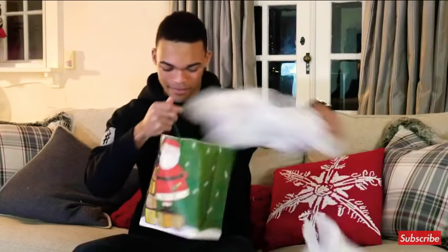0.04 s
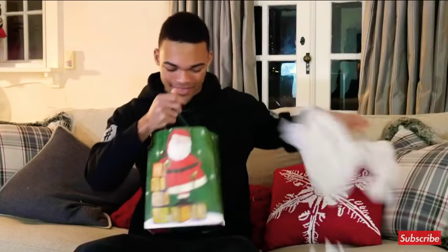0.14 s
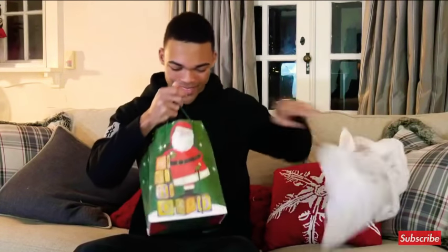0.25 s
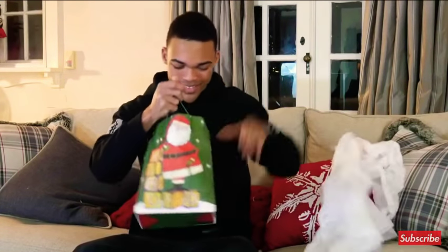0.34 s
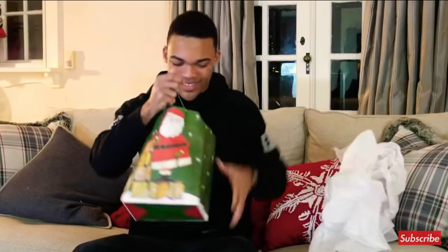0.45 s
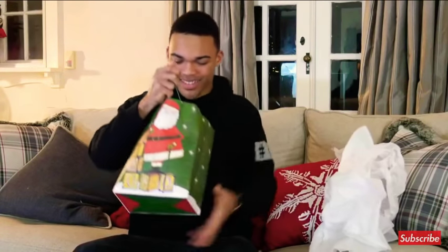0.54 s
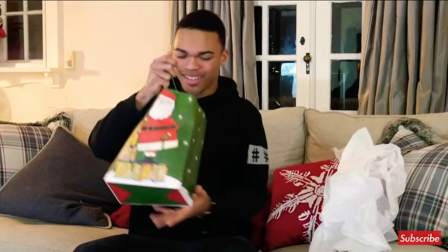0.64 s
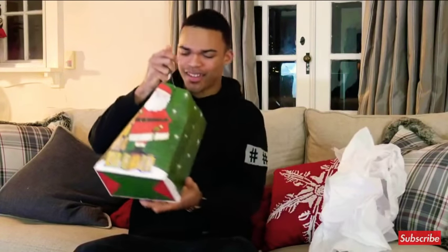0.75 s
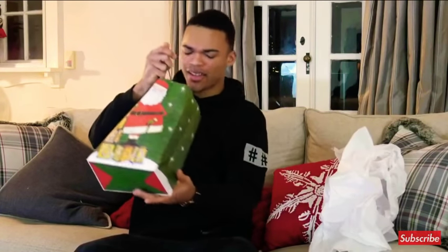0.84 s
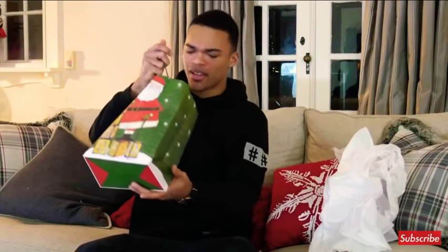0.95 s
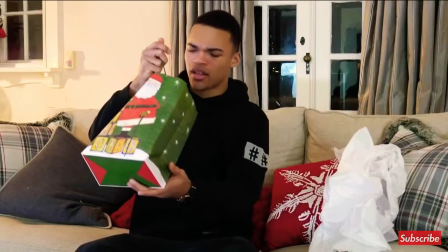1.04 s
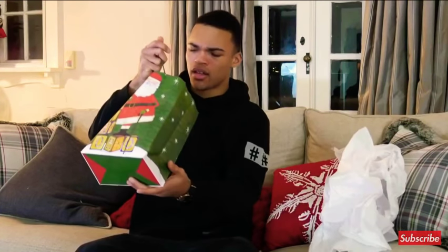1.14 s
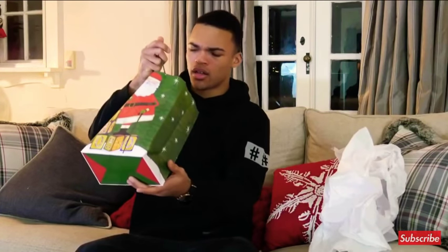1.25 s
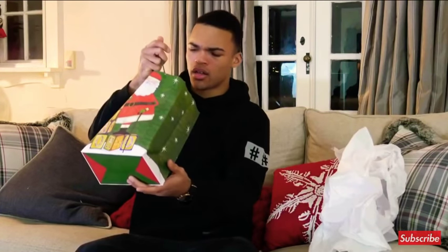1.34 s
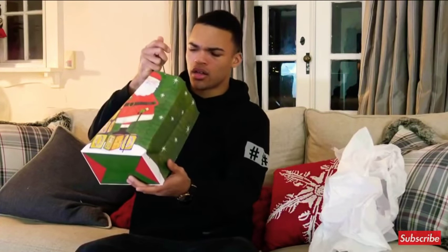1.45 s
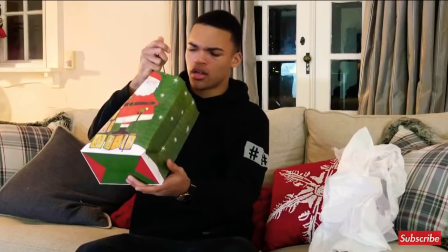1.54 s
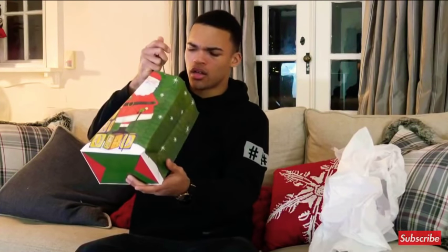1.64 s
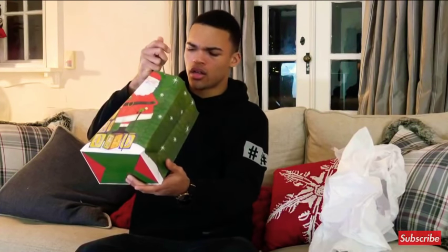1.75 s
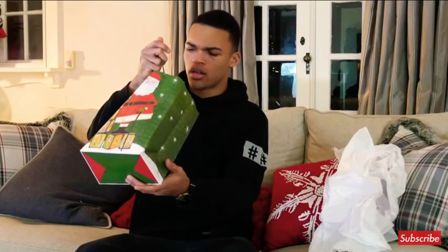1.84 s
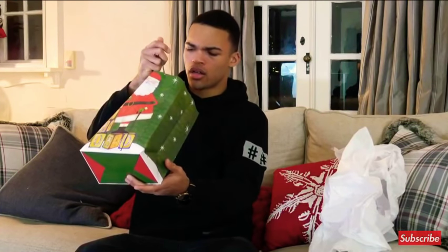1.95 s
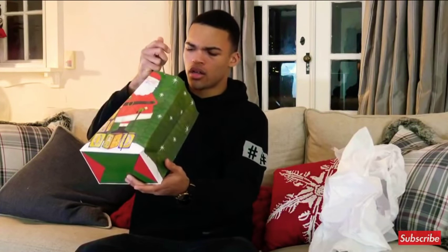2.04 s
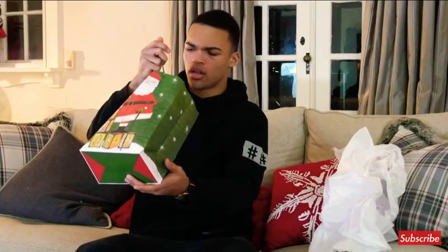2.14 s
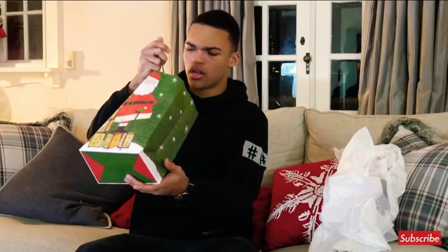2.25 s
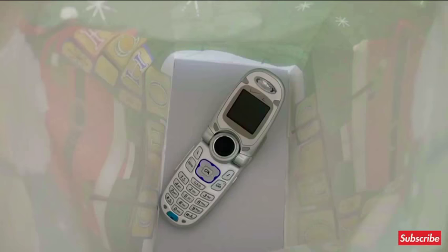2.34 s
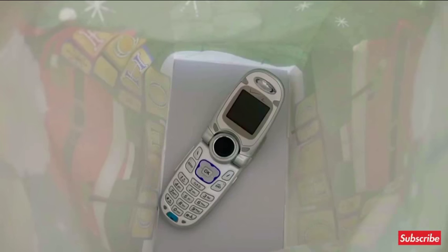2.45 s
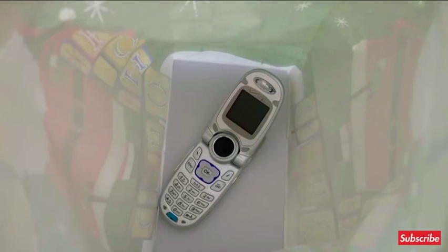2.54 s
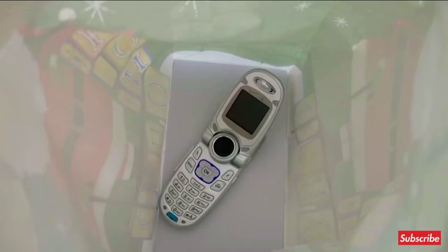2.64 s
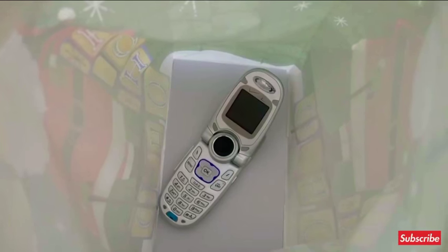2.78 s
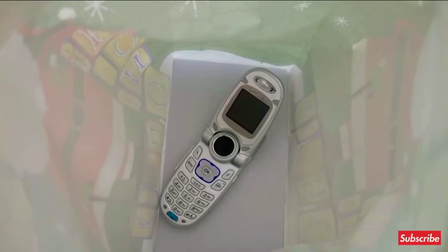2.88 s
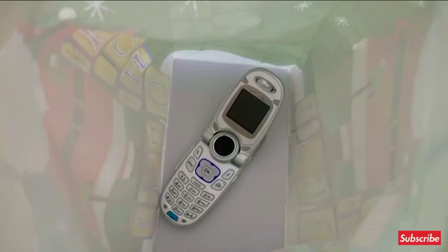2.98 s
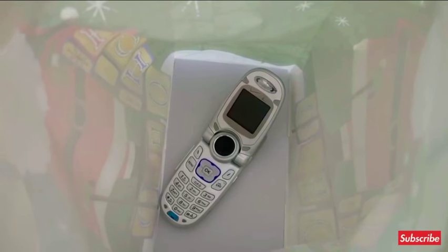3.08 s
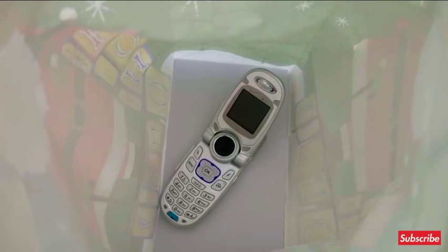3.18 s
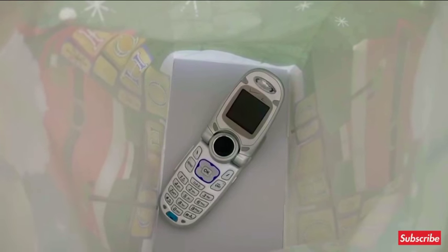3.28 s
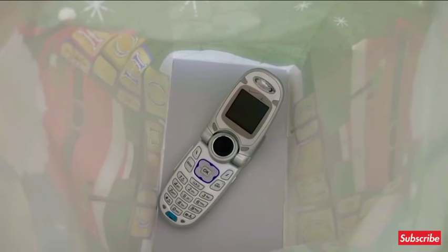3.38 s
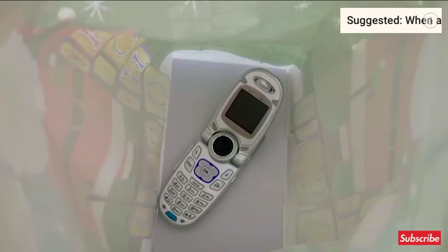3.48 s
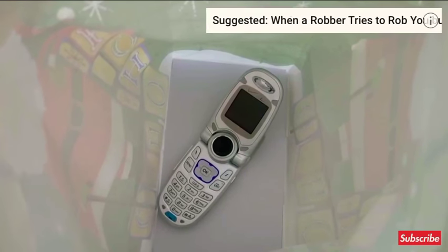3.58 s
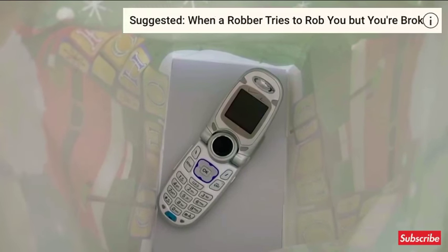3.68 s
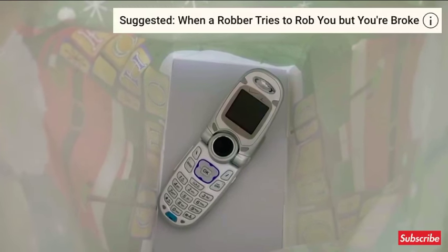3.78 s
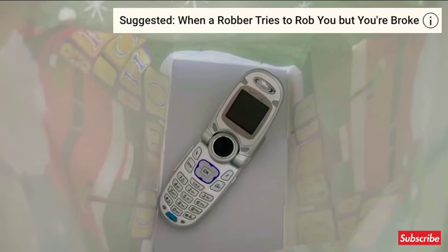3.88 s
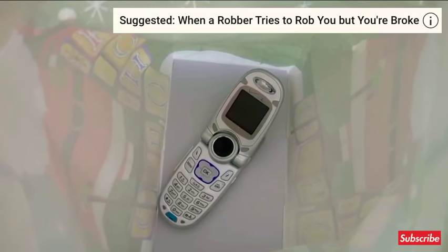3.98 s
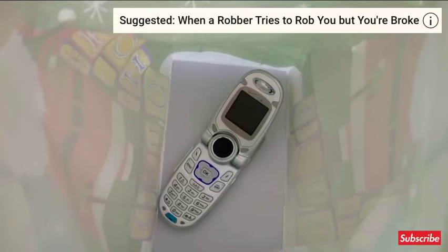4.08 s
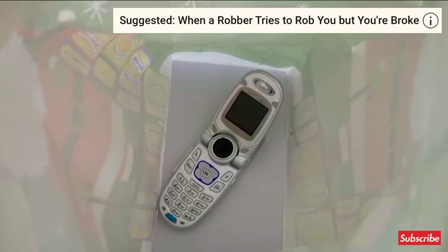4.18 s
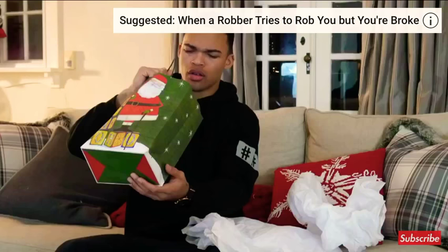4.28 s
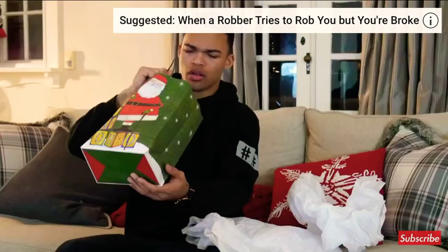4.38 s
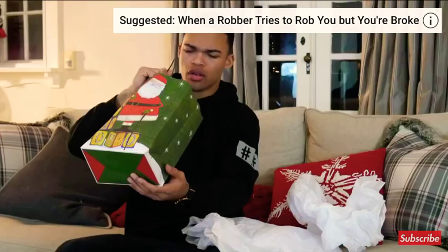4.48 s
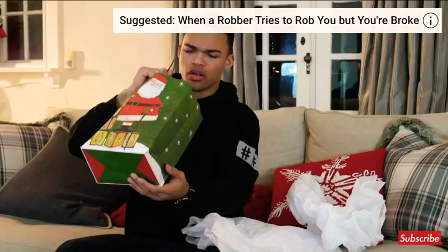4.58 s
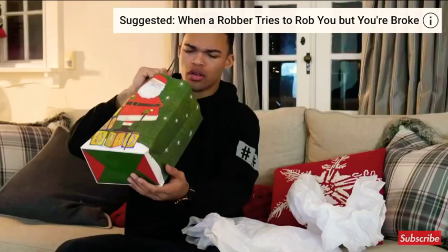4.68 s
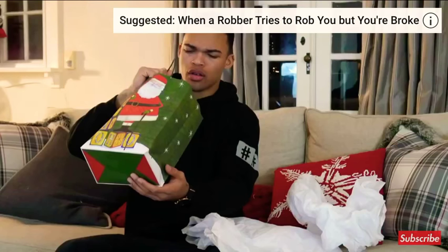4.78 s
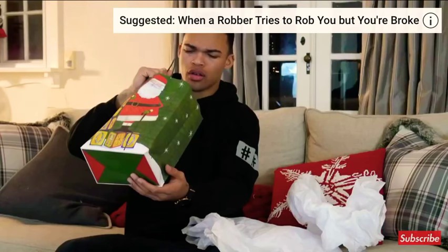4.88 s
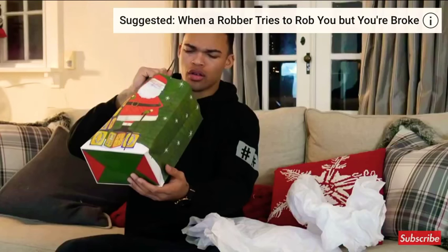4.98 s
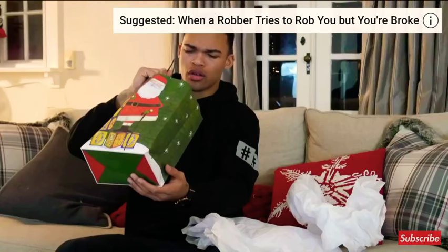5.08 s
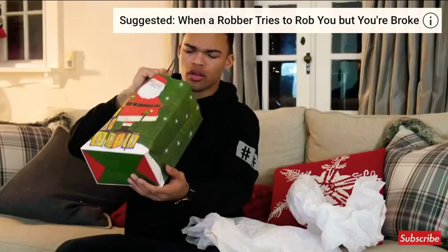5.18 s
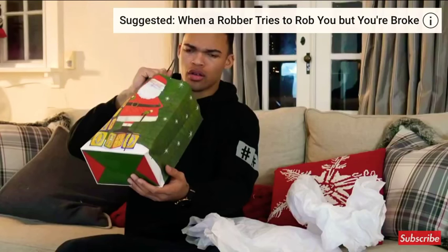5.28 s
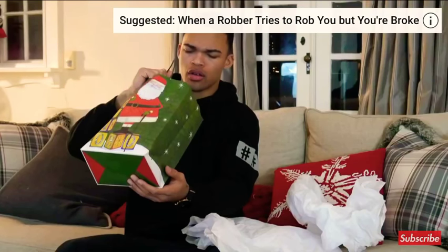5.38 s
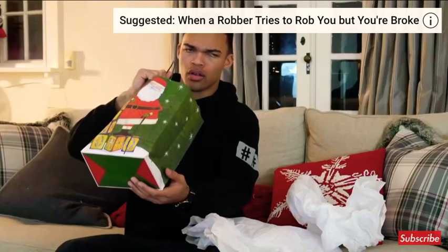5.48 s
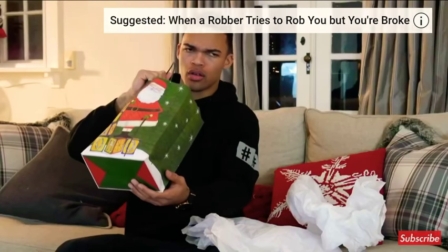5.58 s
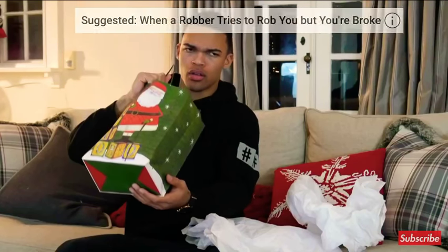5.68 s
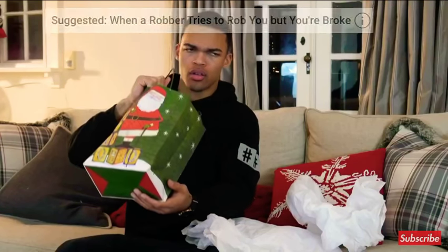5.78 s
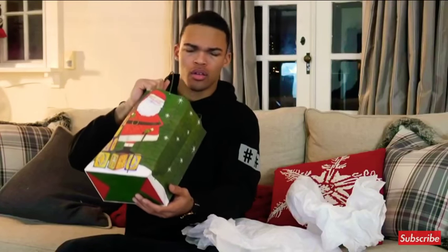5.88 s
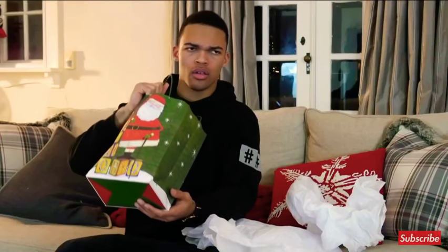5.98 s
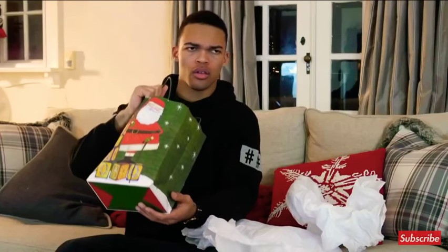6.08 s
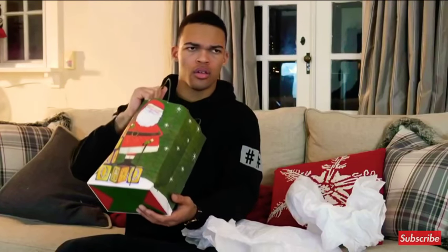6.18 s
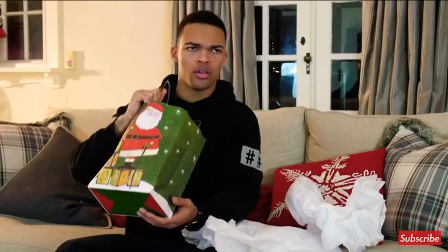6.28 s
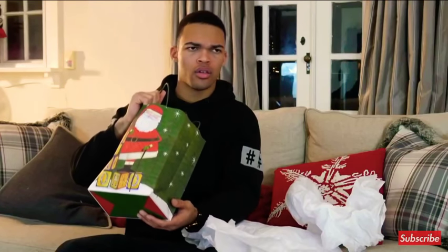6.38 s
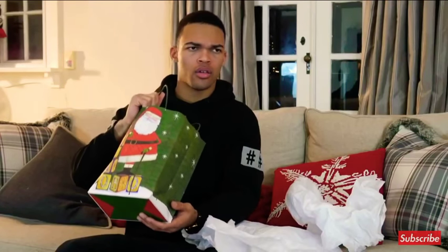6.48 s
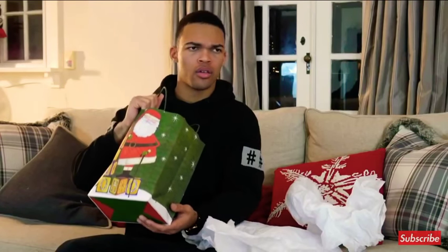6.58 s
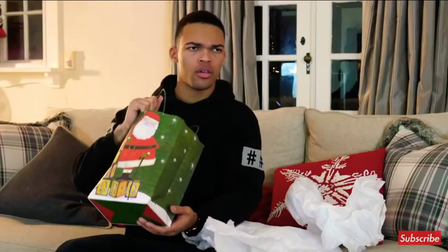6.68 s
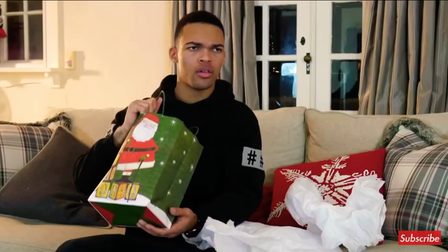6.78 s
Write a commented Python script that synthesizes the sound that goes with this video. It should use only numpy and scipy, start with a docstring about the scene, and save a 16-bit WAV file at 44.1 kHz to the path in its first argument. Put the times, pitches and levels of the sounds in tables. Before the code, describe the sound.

Loud tissue rustling and papery thumps open the scene, one sharp crease snapping out early, then the handling quickly settles. The held bag gives tiny ticks in a hushed, hissy room with a steady faint hum. The background abruptly turns deeper and nearly empty for two seconds, then switches back; a soft bag pop follows, and light creasing gathers at the end. Mono, some way off, with slight indoor reverberation.

```python
"""Tissue paper is pulled from a stiff paper gift bag in a furnished living room: grains of creasing over a rush.
Then the bag is only held: single creases ring and tick, and its walls pop and rattle as resonant panels.
Behind lie a faint appliance hum of steady lines and a room tone of filtered noise. One mono microphone, some way
off; for about two seconds it sits close over the bag, where the room drones lower and only stray creases sound."""
import sys
import numpy as np
from scipy import signal
from scipy.fft import rfft, irfft, next_fast_len
from scipy.io import wavfile
from scipy.ndimage import uniform_filter1d, map_coordinates

SR = 44100
rng = np.random.default_rng(int(sys.argv[2]) if len(sys.argv) > 2 else 0)


def generate_wav(sig):
    """Save sig (samples, or channels by samples) to the path in sys.argv[1] as 16-bit PCM at SR."""
    pcm = np.round(np.clip(np.atleast_2d(sig).T, -1, 1) * 32767).astype(np.int16)
    wavfile.write(sys.argv[1], SR, pcm)


def nominal_scale(level):
    """Amplitude ratio for a level in decibels (scalar or array-like)."""
    x = np.asarray(level, float) / 20
    return 10 ** x


N = 301203

# How busily the paper is handled: [t/s, tissue rustle level/dB, bag wall rustle level/dB]
PAPER_MOVEMENT = [(0.0, -28, -27.5), (0.05, -29.5, -34), (0.15, -28.5, -38.5), (0.24, -28.5, -36.5),
                  (0.274, -32, -35.5), (0.383, -40.5, -48.5), (0.5, -37, -45), (0.63, -43.5, -49.5),
                  (0.768, -53, -52), (0.848, -45.5, -52), (0.954, -52, -51), (1.092, -60.5, -59),
                  (1.26, -63, -71), (1.7, -74, -73), (1.84, -66, -70.5), (1.95, -72, -75), (2.04, -74, -74),
                  (2.12, -68, -75), (2.28, -71.5, -77), (2.56, -67.5, -73), (4.5, -74, -72.5),
                  (5.2, -76, -76), (5.78, -71.5, -75.5), (5.9, -63, -70.5), (6.3, -61, -65.5),
                  (6.53, -61, -64), (6.83, -60.5, -65)]
# Single creases, each with the flurry of rustle it sets off:
# [t/s, level/dB, ring f/Hz, flurry level against the crease/dB]
CREASES = [(0.3888, -22, 8300, -9.5), (1.1007, -42.5, 3900, -13), (1.271, -46, 9000, -35),
           (1.278, -39.5, 7300, -46), (1.317, -47, 11100, -12), (1.3241, -37, 10900, -37),
           (1.401, -51, 3000, -31), (1.44, -51, 4940, -22), (1.446, -44, 5430, -11),
           (1.473, -42.5, 6460, -19), (1.536, -48, 10500, -18), (1.543, -40.5, 10400, -21),
           (1.5728, -39.5, 3500, -19), (1.704, -51, 9500, -24), (1.748, -46, 11000, -18),
           (1.753, -42, 11500, -19), (1.7702, -40, 3800, -16), (1.797, -44.5, 5730, -14),
           (1.998, -48.5, 4100, -13), (2.004, -49, 2960, -21), (2.0787, -51, 9000, -16),
           (2.1072, -53, 4860, -22), (2.1501, -54, 9500, -20), (2.175, -46, 5910, -27),
           (2.182, -45, 6160, -30), (2.2346, -48, 3970, -13), (2.243, -50, 11000, -19),
           (2.3057, -50, 4250, -22), (2.318, -51, 9500, -26), (2.33, -47, 10000, -25),
           (2.379, -51, 11000, -22), (2.401, -52, 9500, -24), (2.447, -52, 10000, -17),
           (2.516, -46.5, 6760, -22), (2.531, -47, 9800, -41), (2.557, -40, 10800, -33),
           (2.847, -47.5, 10100, -28), (2.853, -47, 10300, -26), (3.107, -45.5, 3950, -19),
           (3.1062, -51, 1750, -33), (3.73, -54, 1620, -26), (3.922, -52, 2130, -17),
           (4.59, -48.5, 10000, -11), (4.6748, -51, 10300, -31), (4.722, -51, 7080, -34),
           (4.7936, -48, 10800, -22), (5.031, -47, 6800, -27), (5.0517, -50, 9900, -13.5),
           (5.134, -50, 6800, -24), (5.177, -49.5, 6300, -15), (5.275, -54, 3650, -15),
           (5.3237, -45, 10700, -33), (5.424, -43, 10900, -25), (5.879, -46.5, 5600, -21),
           (5.912, -46, 9500, -25), (6.013, -42, 6590, -34), (6.018, -38, 7200, -30),
           (6.026, -41, 7850, -22), (6.0693, -54, 3000, -27), (6.103, -55, 10500, -32),
           (6.1599, -49, 2320, -26), (6.162, -52, 10000, -30), (6.195, -51, 3500, -22),
           (6.253, -41, 3180, -20), (6.348, -49, 3470, -24), (6.374, -47, 12500, -30),
           (6.4313, -47, 7000, -28), (6.42, -46, 3000, -22), (6.483, -50, 4500, -11),
           (6.523, -47, 3000, -25), (6.5697, -41, 10000, -26), (6.655, -41, 8000, -22),
           (6.675, -44, 2260, -40), (6.7573, -42, 2400, -31), (6.764, -41.5, 2820, -27)]
# Bag walls flexing: [t/s, level/dB, rattle decay t/s, brightness level/dB, favoured f/Hz]
WALL_KNOCKS = [(0.001, -21, 0.0062, -10, 574), (0.02, -35, 0.0081, -8, 850),
               (0.037, -19.5, 0.0075, -2, 690), (0.045, -23, 0.0073, -15, 680),
               (0.067, -32, 0.012, -6, 700), (0.195, -32, 0.0093, -7, 830), (0.231, -29.5, 0.012, -15, 536),
               (0.388, -38, 0.095, -17, 596), (0.574, -31, 0.058, 5, 710), (0.609, -31.5, 0.013, 12, 1500),
               (0.617, -24.5, 0.0076, 9, 1550), (0.629, -24, 0.043, 5.5, 875),
               (0.664, -30, 0.041, -10, 603), (0.849, -36, 0.038, -8, 537), (0.866, -32, 0.029, -7, 303),
               (1.0075, -30.5, 0.025, -5, 2050), (1.009, -40, 0.015, 7, 950), (1.026, -32, 0.0073, -1, 580),
               (1.036, -35.5, 0.011, -12, 375), (1.06, -42.5, 0.03, -2, 383),
               (1.075, -49, 0.025, -20, 2200), (1.289, -52.5, 0.0093, 13.5, 1880),
               (1.468, -53.5, 0.053, 3, 480), (1.994, -59, 0.014, 12, 1300), (4.8164, -35, 0.013, 0, 950),
               (4.826, -37, 0.024, -14, 700), (4.834, -37, 0.017, -12, 264), (4.851, -40, 0.014, -12, 680),
               (4.9, -48.5, 0.035, -25, 700), (5.298, -54, 0.027, -21, 790), (5.834, -50, 0.012, -18, 870),
               (5.853, -51, 0.018, -18, 880), (6.012, -54, 0.025, -10, 2300), (6.739, -49, 0.051, 1, 2180)]
# Colour of the tissue rustle: [f/Hz, relative level/dB]
TISSUE_COLOUR = [(60, -120), (700, -29), (1200, -2), (1820, -3.5), (2350, -3.5), (3200, -5), (4500, -6.5),
                 (6200, -6), (7900, -8.5), (9800, -5), (13500, -12), (15200, -21)]
# Colour of the bag wall rustle: [f/Hz, relative level/dB]
WALL_COLOUR = [(71, -43), (120, -13), (241, -10), (484, -3.5), (681, -7), (821, -6.5), (1060, -9.5),
               (1150, -13.5), (1730, -13), (2020, -12), (7000, -31.5), (9100, -73), (15400, -120)]
# The busier the tissue, the more its crackle fuses to a rush: [rustle level/dB, smooth share 0-1]
RUSH_SHARE = [(-62, .15), (-30, .72)]
# Slips of one crease, the main one first, then weaker ones scattered just before or after it:
# [level against the crease/dB]
SLIP_LEVELS = [-2, -13, -15, -17]
# Resonances of the bag walls: [f/Hz, width/Hz, level/dB]
WALL_MODES = [(225, 90, -3), (375, 45, -2.5), (480, 90, -5), (600, 70, -5), (694, 24, -1), (860, 65, -5),
              (1030, 65, -6), (1283, 100, -8), (1545, 55, -9), (1750, 80, -9), (2035, 45, -8),
              (2218, 28, -6), (2410, 60, -12)]
# While the microphone is close over the bag: [from t/s, to t/s]
CLOSE_SPAN = (2.565, 4.495)
# Reverberation of the living room: [f/Hz, time to fall 60 dB t/s]
ROOM_DECAY = [(200, 0.81), (1000, 0.34), (4000, 0.45), (12000, 0.14)]
# Appliance hum lines: [f/Hz, mean level/dB rms]
HUM_LINES = [(236.9, -72), (263.8, -68), (355.3, -72.5), (839.8, -78.5)]
# Colour of the room tone from the far position: [f/Hz, relative level/dB]
FAR_AIR_COLOUR = [(15, -58), (25, -14), (104, -8), (192, -10), (251, -5), (311, -7), (365, -4.5), (441, -8),
                  (659, -14), (839, -16), (1130, -17), (2660, -25.5), (7990, -26.5), (10400, -24),
                  (15200, -30.5)]
# Colour of the room tone close over the bag: [f/Hz, relative level/dB]
CLOSE_AIR_COLOUR = [(15, -67), (25, -22), (48, -48), (75, -9.5), (244, -8), (311, -3.5), (441, -21),
                    (478, -17), (625, -21.5), (795, -20.5), (1130, -26), (2590, -30), (7990, -37),
                    (10200, -32.5), (15200, -39.5)]
# Noisy drone bands from the far position: [f/Hz, nominal width/Hz, mean level/dB]
FAR_DRONES = [(115, 52, -70), (909, 160, -76), (2635, 330, -78.5)]
# Noisy drone bands close over the bag: [f/Hz, nominal width/Hz, mean level/dB]
CLOSE_DRONES = [(141.4, 12, -71), (253, 53, -69), (314.5, 51, -68), (806.5, 32, -77.5), (920, 110, -74),
                (2630, 150, -81.5), (88, 29, -75)]
# Filters on creases, on the body of a knock and on its bright edge: [f/Hz, gain/dB]
CREASE_COLOUR = [(400, -20), (1500, -2.5), (10500, 3.0), (13000, 2.0), (15500, -22)]
KNOCK_BODY_COLOUR = [(30, -34), (90, 2), (200, 6), (16000, 9)]
KNOCK_EDGE_COLOUR = [(700, -13.5), (1500, 15), (1800, 8.0), (2100, 3.5), (2450, 8.5), (3200, 1.5),
                     (6000, -8.5), (14000, -46)]


def unit(x):
    """Scaled to rms 1."""
    return x / np.sqrt(np.mean(x ** 2) + 1e-20)


def along(points, hz):
    """Points (f/Hz, value) read on a log frequency axis."""
    f, v = np.transpose(points)
    return np.interp(np.log(hz + 1), np.log(f + 1), v)


def wobble(rate):
    """A smooth random curve with rate knots a second."""
    knots = rng.standard_normal(int(N * rate / SR) + 4)
    return map_coordinates(knots, [np.arange(N) * rate / SR])


def filtered(x, response):
    """x shaped by a complex response of frequency."""
    m = next_fast_len(N + SR // 2)
    spectrum = rfft(x, m) * response(np.fft.rfftfreq(m, 1 / SR))
    return irfft(spectrum, m)[..., :N]


def causal(spectrum):
    """Minimum-phase response of (f/Hz, gain/dB) points, so nothing rings before a blow."""
    def response(hz):
        cepstrum = irfft(np.log(nominal_scale(along(spectrum, hz)) + 1e-6))
        half = len(cepstrum) // 2
        cepstrum[1:half] *= 2
        cepstrum[half + 1:] = 0
        return np.exp(rfft(cepstrum))
    return response


def handling(still):
    """Gains of tissue and wall rustle: the slow movement, plus a flurry of tissue after each crease."""
    rise_s, decay_s = 0.003, 0.014
    t = np.arange(N) / SR
    s, *levels = np.transpose(PAPER_MOVEMENT)
    tissue, walls = nominal_scale([np.interp(t, s, level) for level in levels]) * (1 - still) + 1e-9
    since = t[:SR // 2]
    flurry = (1 - np.exp(-since / rise_s)) * np.exp(-since / decay_s)
    for start_s, db, _, under_db in CREASES:
        start = round(start_s * SR)
        tissue[start:][:len(since)] += nominal_scale(db + under_db) * flurry[:N - start]
    return tissue, walls


def crackle(per_second, centre_hz, cycles, spread_db, clump_db, smooth):
    """Small patches of sheet buckle in clumps, each a few cycles at its own pitch, over the slide of sheet on sheet."""
    draw = rng.random((int(per_second * N / SR), 3))
    pitch = centre_hz * np.exp(0.698 * rng.standard_normal(len(draw)))
    hz = np.clip(pitch, 300, 15000)[:, None]
    size = nominal_scale(-spread_db * np.log(draw[:, 1:2] + 0.098))
    k = np.arange(64)  # samples in a grain
    decay = np.exp(-k / SR * hz / cycles)
    grains = size * np.sin(2 * np.pi * hz * k / SR) * decay * np.sqrt(hz / centre_hz)
    where = (draw[:, :1] * N).astype(int) + k
    buckling = unit(np.bincount(where.ravel(), grains.ravel(), N + len(k))[:N])
    share = np.clip(smooth, 0, 1)
    mixed = np.sqrt(1 - share) * buckling + np.sqrt(share) * rng.standard_normal(N)
    return unit(mixed * nominal_scale(clump_db * wobble(40)))


def patchy(x, depth_db):
    """Different parts of the sheet move in turn, so bands swell and fade on their own."""
    z = signal.stft(x, nperseg=256)[2]
    across_bands = uniform_filter1d(rng.standard_normal(z.shape), size=14, axis=0)
    field = uniform_filter1d(across_bands, size=10, axis=1)
    return unit(signal.istft(z * nominal_scale(depth_db * unit(field)), nperseg=256)[1][:N])


def rustle(tissue_gain, wall_gain):
    """Thin tissue crackles bright; the thick bag walls rustle lower."""
    smooth = np.interp(20 * np.log10(tissue_gain), *np.transpose(RUSH_SHARE))
    tissue = crackle(3000, centre_hz=7500, cycles=1.6, spread_db=2.4, clump_db=0.6, smooth=smooth)
    walls = crackle(1200, centre_hz=1565, cycles=1.66, spread_db=1.5, clump_db=0.0, smooth=0.63)
    tissue = patchy(filtered(tissue, causal(TISSUE_COLOUR)), depth_db=1.0)
    walls = patchy(filtered(walls, causal(WALL_COLOUR)), depth_db=1.2)
    return tissue_gain * tissue + wall_gain * walls


def small_creases(tissue_gain):
    """Chance creases (t/s, level/dB, ring f/Hz), louder the busier the tissue is."""
    per_second, middle_hz = 50, 8000
    base_db, spread_db = -52, 3  # level at a rustle of -62 dB, and its scatter
    growth = 0.7  # dB per dB of rustle
    draw = rng.standard_normal((int(per_second * N / SR), 2))
    s = rng.uniform(0, (N - 1) / SR, len(draw))
    rustle_db = 20 * np.log10(tissue_gain[(s * SR).astype(int)])
    level_db = base_db + growth * (rustle_db + 62) + spread_db * draw[:, 0]
    hz = np.clip(middle_hz * np.exp(0.596 * draw[:, 1]), 2000, 13000)
    return list(zip(s, level_db, hz))


def snaps(rows):
    """Each crease gives way in a few quick slips: a short ring of the freed patch of paper and a broad tick."""
    scatter_s = 0.008  # weaker slips fall from half this before the main one to all of it after
    tick_db, tick_t60_s = -1, 0.003  # tick level against the ring, and its decay
    out, t = np.zeros(N + SR), np.arange(SR // 40) / SR
    for s, db, hz, *_ in rows:
        offsets = [0, *rng.uniform(-scatter_s / 2, scatter_s, 3)]
        detunes = rng.normal(0, 0.056, 4)
        for offset, slip_db, detune in zip(offsets, SLIP_LEVELS, detunes):
            turns = t * hz * np.exp(detune)
            ring = np.sin(2 * np.pi * turns) * np.exp(-turns / 4) * (1 - np.exp(-turns))
            tick = nominal_scale(tick_db - 60 * t / tick_t60_s) * rng.choice([-1, 1], len(t))
            start = round(abs(s + offset) * SR)
            out[start:][:len(t)] += nominal_scale(db + slip_db) * (ring + tick)
    return filtered(out[:N], causal(CREASE_COLOUR))


def knocks():
    """A panel pops and rattles briefly; where it is held favours some modes, and its bright edge varies."""
    pop_db = 13  # first pop over the rattle
    favour_db, favour_octaves = 9, 0.3  # lift of modes near the favoured pitch, and its reach
    dull, bright, t = np.zeros(N + SR), np.zeros(N + SR), np.arange(SR // 4) / SR
    hz, width, mode_db = np.transpose(WALL_MODES)[:, :, None]
    signs = (-1.) ** np.arange(len(WALL_MODES))[:, None]
    decay = 2 * np.pi * width / SR * np.exp(-np.pi * width * t)
    modes = signs * decay * np.cos(2 * np.pi * hz * t)
    for s, db, rattle_s, bright_db, best_hz in WALL_KNOCKS:
        fall = np.exp(-(t / rattle_s) ** 1.5) + 0.6 * np.exp(-t / 0.004)
        shape = nominal_scale(db) * fall * (1 - np.exp(-t / 0.0005))
        # the rattle's level jumps every 90 samples
        slips = nominal_scale(2 * rng.standard_normal(len(t) // 90 + 1).repeat(90)[:len(t)])
        shake = shape * slips * rng.standard_normal((2, len(t)))
        shake[:, 0] = nominal_scale(db + pop_db)
        lift_db = favour_db * np.exp(-(np.log2(hz / best_hz) / favour_octaves) ** 2)
        panel = (nominal_scale(mode_db + lift_db) * modes).sum(axis=0)
        ring = signal.fftconvolve(shake[0], panel)
        start = round(s * SR)
        dull[start:][:len(ring)] += ring[:N + SR - start]
        bright[start:][:len(t)] += nominal_scale(bright_db - 15.0) * shake[1]
    body = filtered(dull[:N], causal(KNOCK_BODY_COLOUR))
    return body + filtered(bright[:N], causal(KNOCK_EDGE_COLOUR))


def room(x, wet_db):
    """Direct sound plus a noise tail with its own decay per band; a new tail every 0.3 s as things move."""
    out, hop = np.pad(x, (0, SR)), int(0.3 * SR)
    for start in range(0, N, hop):
        block = x[start:start + hop]
        if np.abs(block).max() < 1e-9:
            continue
        hz, t, z = signal.stft(rng.standard_normal(SR // 2), SR, nperseg=256)
        decay = nominal_scale(-60 * t / along(ROOM_DECAY, hz)[:, None])
        tail = signal.istft(z * decay, SR, nperseg=256)[1]
        wet = signal.fftconvolve(block, tail / np.linalg.norm(tail))
        arrival = start + 150  # 3.4 ms after the direct sound
        out[arrival:][:len(wet)] += nominal_scale(wet_db) * wet[:len(out) - arrival]
    return out[:N]


def hum():
    """A compressor's lines, nearly steady in level and phase."""
    t = np.arange(N) / SR
    waver_db, drift_rad = 1.2, 0.5
    total = np.zeros(N)
    for hz, db in HUM_LINES:
        level = np.sqrt(2) * nominal_scale(db + waver_db * wobble(3.2))
        total += level * np.sin(2 * np.pi * hz * t + drift_rad * wobble(2.85))
    return total


def air(spectrum, db, drones):
    """Room tone: broad hiss and a few narrow noisy bands that waver in level."""
    hiss = filtered(rng.standard_normal(N), lambda hz: nominal_scale(along(spectrum, hz)))
    tone = nominal_scale(db) * unit(hiss)
    for centre, width, band_db in drones:
        # a resonance applied twice
        band = lambda hz: (1j * hz * width / (centre ** 2 - hz ** 2 + 1j * hz * width)) ** 2
        drone = unit(filtered(rng.standard_normal(N), band))
        tone += nominal_scale(band_db + 2.2 * wobble(7.4)) * drone
    return tone


def scene():
    """The microphone changes place abruptly: the room tone changes and any echo breaks off."""
    t = np.arange(N) / SR
    inside = (t > CLOSE_SPAN[0]) & (t < CLOSE_SPAN[1])
    close = uniform_filter1d(inside * 1., size=200)  # a fade of a few ms
    tissue, walls = handling(still=close)
    paper = rustle(tissue, walls) + snaps(small_creases(tissue) + list(CREASES))
    far = room(paper + knocks(), wet_db=-8.5) + air(FAR_AIR_COLOUR, -69.0, FAR_DRONES) + hum()
    near = room(close * paper, wet_db=-12) + air(CLOSE_AIR_COLOUR, -62.5, CLOSE_DRONES)
    mono = (1 - close) * far + close * near
    return np.array([mono, mono])


def low_pass(x):
    """Removes everything above the highest recorded frequency."""
    return signal.sosfilt(signal.butter(12, 15350, fs=SR, output="sos"), x)


def record(dry):
    """The microphone signal with a narrow dip near 8 kHz."""
    notch = lambda hz: 1 - 0.57 * np.exp(-((hz - 7880) / 110) ** 2)
    finished = filtered(dry, notch)
    return low_pass(finished)


dry = scene()
out = record(dry)
generate_wav(out)
```